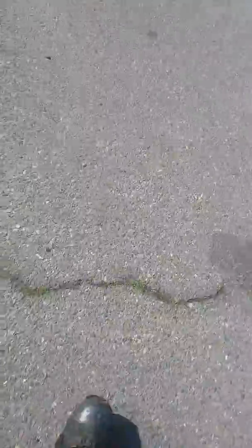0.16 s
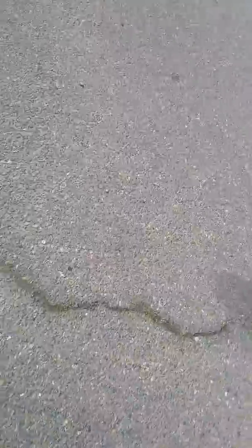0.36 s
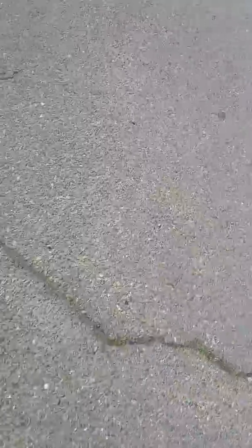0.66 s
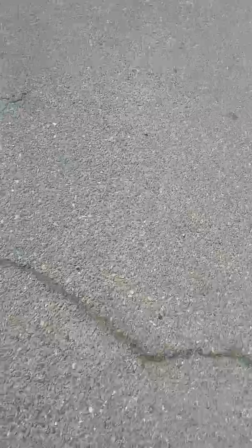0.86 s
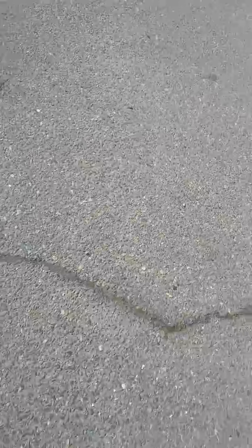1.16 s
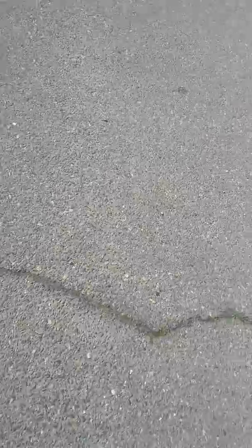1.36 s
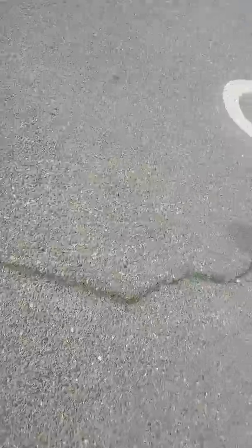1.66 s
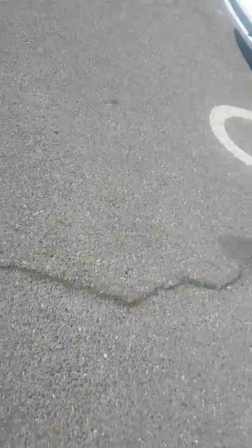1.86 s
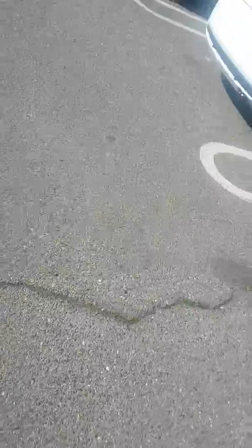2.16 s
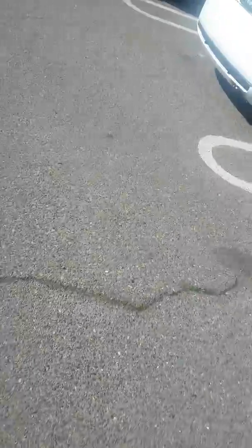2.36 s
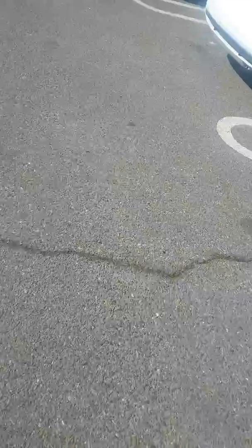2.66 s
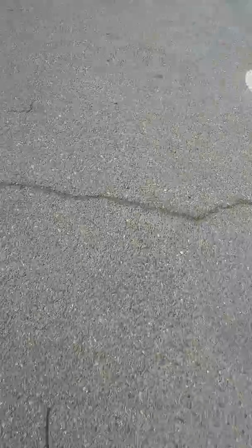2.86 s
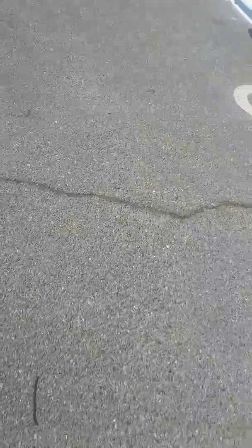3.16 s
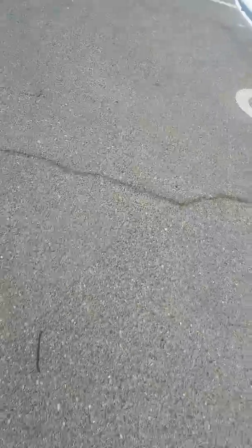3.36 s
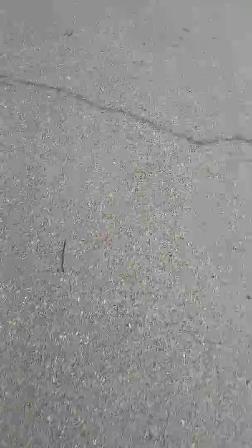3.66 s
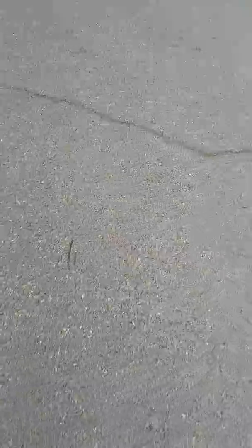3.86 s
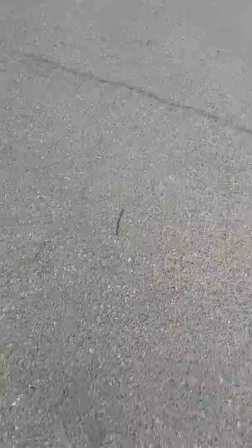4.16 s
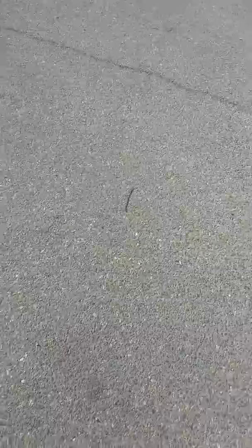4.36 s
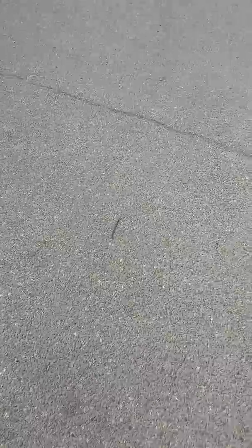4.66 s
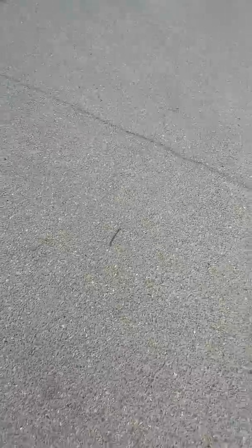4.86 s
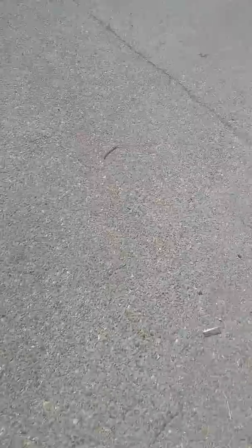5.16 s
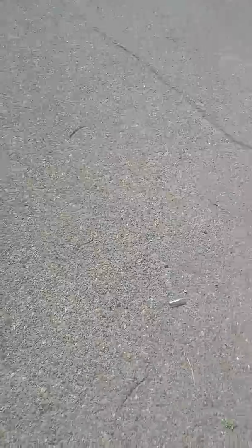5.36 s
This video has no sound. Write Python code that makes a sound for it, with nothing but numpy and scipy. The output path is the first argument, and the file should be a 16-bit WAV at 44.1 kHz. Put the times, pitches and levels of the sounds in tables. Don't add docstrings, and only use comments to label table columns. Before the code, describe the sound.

Labouring engine crank, two loud cracks, a roaring rev flare that falls away, then a deep uneven exhaust idle and a gritty shoe scrape.

```python
import sys
import numpy as np
from scipy import signal
from scipy.io import wavfile
from scipy.ndimage import uniform_filter1d

SR = 44100
rng = np.random.default_rng(int(sys.argv[2]) if len(sys.argv) > 2 else 0)


def gain_from_db(level_db):
    decades = np.asarray(level_db, float) / 20
    return 10 ** decades


def master_out(mix):
    frames = np.transpose(np.atleast_2d(mix))
    ceiling = np.clip(frames, -1, 1)
    pcm = np.round(ceiling * 32767).astype(np.int16)
    wavfile.write(sys.argv[1], SR, pcm)


N = 242991

# (time [s], hiss level [dB], grind level [dB], length [s])
COMPRESSIONS = [
    (0.185, -45, -30, 0.011),
    (0.368, -53.5, -26, 0.1),
    (0.585, -51, -24.5, 0.039),
    (0.712, -46, -26, 0.028),
    (0.838, -47.5, -23, 0.023),
    (0.914, -38, -24.5, .012),
]
# (time [s], level [dB])
THUMPS = [
    (.02, -25),
    (.27, -16),
    (.36, -20.5),
    (.44, -19),
    (.51, -25.5),
    (.65, -20.5),
    (.9, -22.5),
]
# (frequency [Hz], density [dB per Hz])
GRIND_COLOUR = [(180, -18), (300, -5), (357, -3), (441, -6.5), (612, -3), (674, -6), (1010, -5),
                (2100, -18), (3000, -38.5), (3900, -49), (6600, -120)]
# (time [s], frequency [Hz], level [dB])
WHINE = [
    (.3, 1290, -50),
    (.36, 1280, -38),
    (.395, 1230, -42),
    (.415, 1080, -30),
    (.45, 990, -36),
    (.48, 900, -55),
]
THUMP_S, GRIND_STRETCH = 0.033, 1.1
THUMP_FLOOR_DB, GRIND_FLOOR_DB, HISS_FLOOR_DB = -27, -32, -83.5

# (time [s], level [dB], length [s])
BRUSHES = [(0.061, -56, 0.022), (0.168, -62, 0.016), (0.373, -69, 0.055), (0.906, -68.5, 0.019),
           (0.938, -51.5, 0.004), (1.04, -64.5, 0.069), (3.677, -62.5, 0.063), (4.028, -66.5, 0.09),
           (4.36, -63.5, .05), (5.25, -66, .04), (5.37, -55, 0.049), (5.473, -65, 0.043)]
# (frequency [Hz], width [Hz], level [dB])
RUSTLE_MODES = [(9700, 820, 1.5), (14200, 2700, -15), (7000, 2000, -12)]
# (time [s], peak level [dB])
TICKS = [(0.1321, -32.5), (0.171, -53), (0.2733, -49), (0.7125, -32.5), (3.3215, -39), (5.2625, -50),
         (5.3534, -44), (5.375, -43), (5.4064, -48.5), (5.5074, -38)]
RUSTLE_DB, RUSTLE_PRESSURE_DB, RUSTLE_NEAR_SHARE = -76.5, 16.5, .9

# (time [s], four-stroke cycle rate [1/s])
SPEED = [(0.88, 8.789), (1.0, 10.652), (1.15, 14.115), (1.3, 14.85), (1.45, 14.244), (1.7, 12.147),
         (1.9, 10.675), (2.2, 8.923), (2.4, 8.643), (2.62, 7.266), (2.8, 7.575), (2.95, 8.179),
         (3.2, 8.384), (3.5, 8.619), (3.9, 8.638), (4.7, 8.438), (5.51, 8.411)]
START_CYCLES = .067
# (time [s], gas pressure [0-1], nearness [dB], view into the pipes [dB])
ENGINE = [(.86, 0.3, -7, 13.5), (.95, 0.96, -2.5, 11), (1.05, 0.81, -7, 2), (1.3, 1, -15.5, 1.5),
          (1.45, 0.82, -16.5, -1), (1.7, 0.69, -17, -5), (1.95, 0.03, -11.5, 3), (2.35, 0.02, -13, 2),
          (2.8, -.1, -11, 3.5), (3.0, 0, -5, 2.5), (3.22, 0.08, -2, 7.5), (3.5, 0, -.1, 4),
          (3.68, 0.09, 1.8, -1.5), (3.9, 0, 1.2, 2.5), (4.25, 0, -0.2, 2.8), (4.7, 0.12, 0.3, -4),
          (4.85, 0.24, -1, -17), (5.51, 0.1, 0.3, -2.5)]
# (pipe [0 or 1], blow-down crank angle [deg], boom level [dB])
FIRING = [(0, -20, -1.3), (0, 50, 3.1), (1, 240, -4.1), (0, 230, 1.8), (1, 423, -.6), (1, 504, 2.3),
          (0, 521, -3.6), (1, 687, 2.3)]
# (time [s], level [dB])
SECOND_PIPE = [(.9, 1.5), (1.5, 1), (2.2, -3.3), (2.9, -3), (3.4, 2.5), (3.9, 0.5), (4.4, 2.6), (5, 1.5),
               (5.5, 2.5)]
# (crank angle [deg], level [dB])
JETS = [(-12, 0), (75, -11), (165, 0), (255, -8), (345, -7), (430, -13), (517, -3), (610, -12)]
# (frequency [Hz], t60 [s], swing in pipe 0 [gain], swing in pipe 1 [gain])
PIPE_MODES = [(68.4, 0.69, 0.098, -0.041), (105.05, 0.56, 0.088, -0.092), (146.4, 0.38, 0.16, 0.16),
              (204.3, 0.34, -0.081, -0.034), (246.5, 0.26, 0.011, -0.1), (277.5, 0.47, 0.025, -0.0015),
              (340, 0.68, -0.0063, -0.0071), (398.9, 0.22, 0.0111, -0.0094)]
# (frequency [Hz], width [Hz], level [dB])
BARK_MODES = [(354.4, 39, 3), (397, 61, 1), (526, 61, -6.5), (606, 12, -0.5), (667.6, 18, -7),
              (848, 140, -11), (1400, 200, -25)]
# (frequency [Hz], width [Hz], level [dB])
RASP_MODES = [(2094, 500, 2.5), (2590, 610, -2.5)]
# (frequency [Hz], width [Hz], level [dB])
SIZZLE_MODES = [(3940, 920, -5.5), (4940, 1200, -3), (5240, 300, -7)]
# (frequency [Hz], width [Hz], level [dB])
PING_MODES = [(5450, 700, 3), (8200, 1300, -2)]
# (idle level [dB], rise at full pressure [dB], nearness share [dB/dB], view share [dB/dB])
LAYERS = [
    (-9.5, -4, 0.86, 0.012),
    (-38, 33.5, 0.65, .01),
    (-44.5, 22.5, 0.77, 1),
    (-58.5, 43, 1.91, 0.48),
    (-69, 33, 1.46, 0.6),
]
# (time [s], level [dB])
SURGES = [
    (.95, -24),
    (1.05, -11),
    (1.14, -32),
    (1.4, -13),
    (1.77, -25),
    (2.16, -16),
]
# (time [s], level [dB])
LOBE = [(3.85, 0.84)]
SURGE_RISE_S, SURGE_FALL_S = 0.065, 0.042
LOBE_S, LOBE_FLOOR_DB = .55, -2.5
FULL_LOAD, LOAD_PER_PRESSURE, LOADED_FROM_S, LOADING_S = .65, .8, .96, .14
ROUGH_DB, LOADED_DB, SETTLED_DB = 2.2, 1.5, .8
SETTLES_FROM_S, SETTLED_AT_S = 2.8, 3.5
MISFIRE_FROM_S, MISFIRE_UNTIL_S = .966, .999
COLD_BARK_DB, COLD_JET_DB = -11.5, -14
DEEP_SHARE = .45

# (frequency [Hz], density [dB per Hz])
CLATTER_COLOUR = [(180, -30.5), (300, -4), (399, 2), (460, -6.5), (1020, -5), (2080, -19), (2970, -27),
                  (4110, -57), (5020, -74.5), (9000, -56), (11700, -96.5), (19800, -120)]
CLATTER_DB, CLATTER_NEAR_SHARE = -32, 1.16

# (time [s], level [dB])
CATCH = [(.945, -5.5)]
CATCH_HZ, CATCH_RISE_S, CATCH_FALL_S = 98.5, 0.016, 0.0076

# (time [s], peak level [dB], length [ms], rattle level [dB])
BACKFIRES = [
    (.9758, 5, 2.2, -30),
    (1.0005, 1, .6, -14),
    (1.2122, -11, .4, -28),
    (1.229, -13, .4, -30),
    (1.4013, -13, 1.5, -40),
    (1.4886, -14, 1.5, -42),
]

# (multiple of the cycle rate [1], level [dB])
HOWL_ORDERS = [(8, -4), (12, -8.5), (16, -2), (20, -4.5), (24, -8.5), (28, -2), (36, -5.5), (40, -14.5),
               (44, -11.5)]
# (frequency [Hz], width [Hz], level [dB])
HOWL_MODES = [(111.8, 24, 8.5), (146, 15.2, 17.5), (225.4, 33, 10), (285.5, 26, 4.5), (320.3, 16, 4.5),
              (420, 15, 0), (531.5, 24, 3), (644, 76, -1)]
# (time [s], level [dB])
HOWL_SWELL = [(1.18, -9)]
HOWL_RISE_S, HOWL_FALL_S = 0.05, 0.04
HOWL_HOLD_DB, HOWL_FROM_S, HOWL_UNTIL_S, HOWL_EDGE_S = -15, 1.06, 1.857, 0.01

# (time [s], peak level [dB])
SCUFF = [
    (5.286, -21),
    (5.296, -23),
    (5.3127, -30),
    (5.342, -17),
    (5.3775, -22),
    (5.4024, -22.5),
    (5.428, -32),
]

LOST_AT_S, LOST_SAMPLES, SPLICE_STEP_DB = 3.6169, 1024, -8
MIC_HISS_DB, MIC_HISS_NEAR_SHARE, MIC_TOP_HZ = -70.5, 1.0, 15800


def seconds():
    return np.arange(N) / SR


def rms_one(x):
    return x / np.sqrt(np.mean(x ** 2) + 1e-20)


def in_time(rows):
    s, *columns = np.transpose(rows)
    return [np.interp(seconds(), s, c) for c in columns]


def band(x, low_hz, high_hz, order=2):
    return signal.sosfilt(signal.butter(order, [low_hz, high_hz], "band", fs=SR, output="sos"), x)


def ring(clicks, hz, t60_s):
    r, w = gain_from_db(-60 / (t60_s * SR)), 2 * np.pi * hz / SR
    return signal.lfilter([0, np.sin(w)], [1, -2 * r * np.cos(w), r * r], clicks + 1e-18)


def resonate(x, modes):
    out = 0
    for k, (hz, width_hz, db) in enumerate(modes):
        r = np.exp(-np.pi * width_hz / SR)
        gain = (-1) ** k * gain_from_db(db) * (1 - r * r) / 2
        poles = [1, -2 * r * np.cos(2 * np.pi * hz / SR), r * r]
        out = out + signal.lfilter([gain, 0, -gain], poles, x)
    return out


def even(x, window_s):
    return x / np.sqrt(uniform_filter1d(x ** 2, int(window_s * SR)) + 1e-12)


def coloured(points, flicker_db):
    hz, db = np.transpose(points)
    edges = np.geomspace(hz[0], hz[-1], num=14)
    white = rng.standard_normal((2, N))
    out = 0
    for k, (low, high) in enumerate(zip(edges, edges[1:])):
        flicker = np.interp(np.arange(N) / 2000, np.arange(200), rng.standard_normal(200))
        level_db = np.interp(np.log(low * high) / 2, np.log(hz), db)
        out = out + gain_from_db(level_db + flicker_db * flicker) * band(white[k % 2], low, high)
    return rms_one(out)


def swells(rows, rise_s, fall_s, floor):
    t, power = seconds(), floor ** 2
    rises, falls = np.broadcast_to(rise_s, len(rows)), np.broadcast_to(fall_s, len(rows))
    for (s, db), rise, fall in zip(rows, rises, falls):
        power = power + gain_from_db(2 * db) * np.exp(-((t - s) / np.where(t < s, rise, fall)) ** 2)
    return np.sqrt(power)


def click_train(rows, lift_db):
    clicks = np.zeros(N)
    for s, db in rows:
        clicks[round(s * SR)] = gain_from_db(db + lift_db)
    return clicks


def lose_block(x):
    at = round(LOST_AT_S * SR)
    return np.delete(x, np.s_[at:at + LOST_SAMPLES])


def keep_block(x):
    at = round(LOST_AT_S * SR)
    return np.insert(x, at, np.full(LOST_SAMPLES, x[at]))


def starter():
    s, hiss_db, grind_db, length_s = np.transpose(COMPRESSIONS)
    grind_s = GRIND_STRETCH * length_s
    thumping = swells(THUMPS, THUMP_S, THUMP_S, gain_from_db(THUMP_FLOOR_DB))
    grinding = swells(np.c_[s, grind_db], grind_s, grind_s, gain_from_db(GRIND_FLOOR_DB))
    hissing = swells(np.c_[s, hiss_db], length_s, length_s, gain_from_db(HISS_FLOOR_DB))
    white = rng.standard_normal((2, N))
    thump = rms_one(resonate(band(white[0], 59, 365), [(72.6, 19, -1.5), (140, 32, -0.2), (212, 118, -8)]))
    hiss = rms_one(band(band(white[1], 2200, 8200), 2500, 3700, order=1))
    out = thumping * thump + grinding * coloured(GRIND_COLOUR, flicker_db=0.5) + hissing * hiss
    hz, whine_db = in_time(WHINE)
    turn, t = 2 * np.pi * np.cumsum(hz) / SR, seconds()
    whining = (t > WHINE[0][0]) & (t < WHINE[-1][0])
    out += whining * gain_from_db(whine_db) * (np.sin(turn) + 0.73 * np.sin(2 * turn))
    return out * np.clip((.93 - t) / 0.021, 0, 1)


def handling():
    rustle = rms_one(band(resonate(rng.standard_normal(N), RUSTLE_MODES), 5000, 16000))
    s, db, length_s = np.transpose(BRUSHES)
    pressure, near_db, _ = in_time(ENGINE)
    floor = gain_from_db(RUSTLE_DB + RUSTLE_PRESSURE_DB * pressure + RUSTLE_NEAR_SHARE * near_db)
    brushing = swells(np.c_[s, db], length_s, length_s, floor)
    return brushing * rustle + band(click_train(TICKS, lift_db=12), 7700, 14000)


def crank():
    speed = in_time(SPEED)[0] * (seconds() >= SPEED[0][0])
    return START_CYCLES + np.cumsum(keep_block(speed)) / SR


def load():
    caught = np.clip((seconds() - LOADED_FROM_S) / LOADING_S, 0, 1)
    return keep_block(caught * np.clip(LOAD_PER_PRESSURE * in_time(ENGINE)[0], 0, FULL_LOAD))


def scatter():
    idle_db = keep_block(np.interp(seconds(), [SETTLES_FROM_S, SETTLED_AT_S], [ROUGH_DB, SETTLED_DB]))
    return idle_db + (LOADED_DB - idle_db) * load() / FULL_LOAD


def strokes(turned, degrees, db, scatter_db, jitter_degrees):
    chance = np.clip(rng.standard_normal((46, 2)), -2, 2)
    wanted = np.arange(46) + (degrees + jitter_degrees * chance[:, 0]) / 720
    at = np.searchsorted(turned, wanted)
    inside = (wanted > turned[0] + .1) & (at < len(turned))
    clicks = np.zeros(len(turned))
    clicks[at[inside]] = gain_from_db(db + scatter_db[at[inside]] * chance[inside, 1])
    return clicks


def layer_gains():
    pressure, near_db, view_db = in_time(ENGINE)
    boom, *rest = [gain_from_db(idle_db + full_db * pressure + near_share * near_db + view_share * view_db)
                   for idle_db, full_db, near_share, view_share in LAYERS]
    cold = seconds() < MISFIRE_UNTIL_S
    cold_db = [COLD_BARK_DB, COLD_JET_DB, COLD_JET_DB, COLD_JET_DB / 2]
    rest = [gain * gain_from_db(db * cold) for gain, db in zip(rest, cold_db)]
    return [swells(SURGES, SURGE_RISE_S, SURGE_FALL_S, boom)] + rest


def pipe_boom(turned, scatter_db):
    pipes = np.zeros((2, len(turned)))
    for pipe, degrees, db in FIRING:
        pipes[pipe] += strokes(turned, degrees, db, scatter_db, jitter_degrees=.6)
    pipes[1] *= gain_from_db(keep_block(in_time(SECOND_PIPE)[0]))
    boom = sum(ring(first * pipes[0] + second * pipes[1], hz, t60_s)
               for hz, t60_s, first, second in PIPE_MODES)
    boom = band(band(boom, 52, 1100, order=4), 60, 2000)
    deep_gain = gain_from_db(DEEP_SHARE * keep_block(in_time(ENGINE)[1]))
    boom += (deep_gain - 1) * band(boom, 55, 73)
    lobe_gain = keep_block(swells(LOBE, LOBE_S, LOBE_S, gain_from_db(LOBE_FLOOR_DB)))
    boom += (lobe_gain - 1) * band(boom, 90, 120)
    return boom


def gas_jets(turned, scatter_db):
    uneven = 1 - load()
    jets = sum(gain_from_db(db * uneven) * strokes(turned, degrees, 0, scatter_db + 1.5, jitter_degrees=3)
               for degrees, db in JETS)
    fade = np.exp(-1 / (.0045 * SR))
    gate = signal.lfilter([1], [1, -fade], jets) + .045
    gas = gate * rng.standard_normal((3, len(gate)))
    bark = band(resonate(jets + 0.12 * gas[0], BARK_MODES), 150, 1900)
    rasp = band(resonate(gas[1] + 3 * jets, RASP_MODES), 1400, 4200)
    sizzle = resonate(gas[2] + 2 * jets, SIZZLE_MODES)
    sizzle = band(band(sizzle, 2500, 5800, order=4), 2400, 3700)
    ping = 0
    for hz, width_hz, db in PING_MODES:
        mode = [(hz, width_hz, 0)]
        ping = ping + gain_from_db(db) * resonate(resonate(gas[0] + jets, mode), mode)
    return bark, rasp, sizzle, ping


def exhaust():
    boom_gain, bark_gain, rasp_gain, sizzle_gain, ping_gain = layer_gains()
    turned, scatter_db = crank(), scatter()
    boom = pipe_boom(turned, scatter_db)
    bark, rasp, sizzle, ping = gas_jets(turned, scatter_db)
    layers = [(boom, boom_gain * gain_from_db(2.5)), (bark, bark_gain * gain_from_db(1.0)), (rasp, rasp_gain * gain_from_db(1.5)),
              (ping, ping_gain), (sizzle, sizzle_gain * gain_from_db(0.5))]
    running = np.clip((seconds() - .87) / 0.021, 0, 1)
    return running * sum(gain * lose_block(even(x, window_s=.2)) for x, gain in layers)


def engine_bay():
    running = np.clip((seconds() - .87) / 0.03, 0, 1)
    gain = gain_from_db(CLATTER_DB + CLATTER_NEAR_SHARE * in_time(ENGINE)[1] + 3)
    return running * gain * band(coloured(CLATTER_COLOUR, flicker_db=.6), 100, 4800, order=4)


def catch():
    tone = np.sqrt(2) * np.sin(2 * np.pi * CATCH_HZ * seconds())
    return swells(CATCH, CATCH_RISE_S, CATCH_FALL_S, 0) * tone


def backfires():
    out, t = np.zeros(N), seconds()
    for s, peak_db, length_ms, rattle_db in BACKFIRES:
        age = (t - s) * 1000 / length_ms
        after = np.maximum(age, 0)
        blast = -gain_from_db(peak_db) * np.sign(np.sin(np.pi * age)) * (age > 0) * np.exp(-after ** 2 / 3)
        decay = (t > s) * np.exp(-np.maximum(t - s, 0) / .014)
        rattle = gain_from_db(rattle_db) * decay * rng.standard_normal(N)
        out += band(blast, 30, 500 + 2200 / length_ms) + band(rattle, 500, 5000, order=4)
    return out


def howl_gain():
    t = seconds()
    opens = np.tanh((t - HOWL_FROM_S) / HOWL_EDGE_S)
    shuts = np.tanh((t - HOWL_UNTIL_S) / HOWL_EDGE_S)
    plateau = (opens - shuts) / 2
    return swells(HOWL_SWELL, HOWL_RISE_S, HOWL_FALL_S, gain_from_db(HOWL_HOLD_DB) * plateau)


def howl():
    turned, orders = crank(), 0
    slack = FULL_LOAD - load()
    for k, db in HOWL_ORDERS:
        waver = np.interp(turned * 4, np.arange(200), rng.standard_normal(200))
        level = gain_from_db(db + k / 9 * waver - k * .8 * slack)
        orders = orders + level * np.sin(2 * np.pi * round(k) * turned + k / 30 * waver)
    lifted = 0.13 * band(orders, 95, 260) + resonate(orders, HOWL_MODES)
    return howl_gain() * lose_block(rms_one(lifted))


def footstep():
    fade = np.exp(-1 / (0.0086 * SR))
    bursts = signal.lfilter([1], [1, -fade], click_train(SCUFF, lift_db=4)) * rng.standard_normal(N)
    return band(resonate(bursts, [(1770, 280, 6.5), (2580, 1500, -9.0), (3850, 440, -6)]), 700, 4500, order=4)


def scene():
    start, end = MISFIRE_FROM_S, MISFIRE_UNTIL_S
    firing = np.interp(seconds(), [start - .004, start, end, end + .002], [1, .4, .4, 1])
    engine = firing * (exhaust() + howl())
    return (starter() + handling() + engine + engine_bay() + catch() + backfires() + footstep())[None]


def band_limit(x):
    return signal.sosfilt(signal.butter(12, 16650, fs=SR, output="sos"), x)


def record(dry):
    after_s = seconds() - LOST_AT_S
    step = gain_from_db(SPLICE_STEP_DB) * (after_s > 0) * np.exp(-np.abs(after_s) / .008)
    hiss_gain = gain_from_db(MIC_HISS_DB + MIC_HISS_NEAR_SHARE * in_time(ENGINE)[1])
    hiss = hiss_gain * band(rng.standard_normal(N), 8000, 18000)
    top_cut = signal.ellip(12, .5, 60, MIC_TOP_HZ, fs=SR, output="sos")
    heard = signal.sosfilt(top_cut, dry + hiss)
    closing = np.clip((N - np.arange(N)) / 12, 0, 1)
    mix = closing * np.tanh((heard + step) / 1.468) * 1.11
    return band_limit(mix)


dry = scene()
out = record(dry)
master_out(out)
```